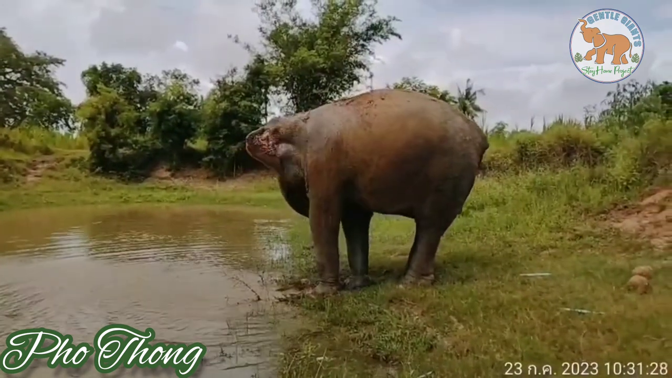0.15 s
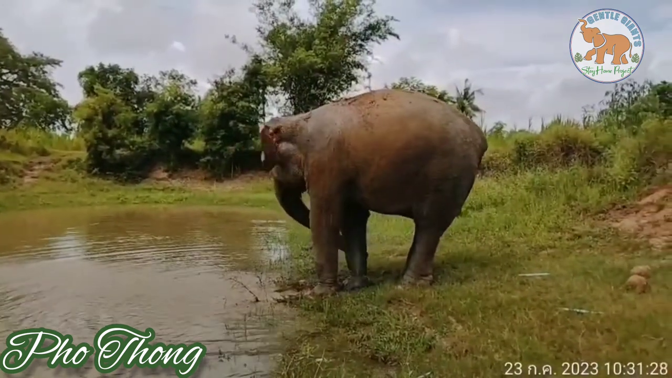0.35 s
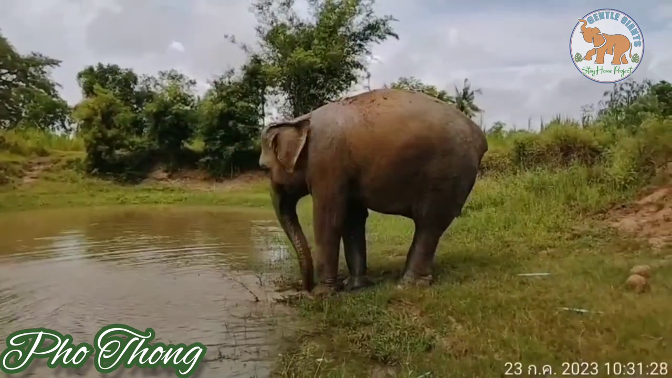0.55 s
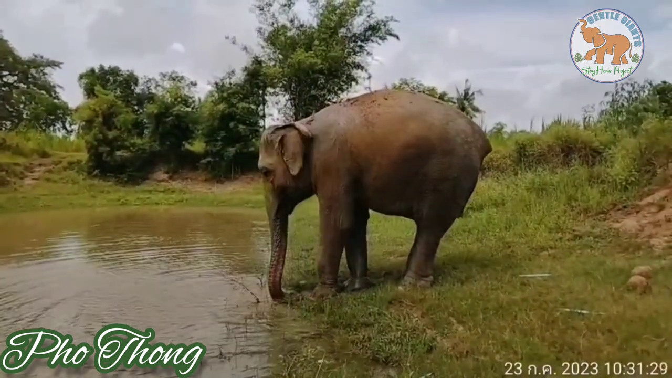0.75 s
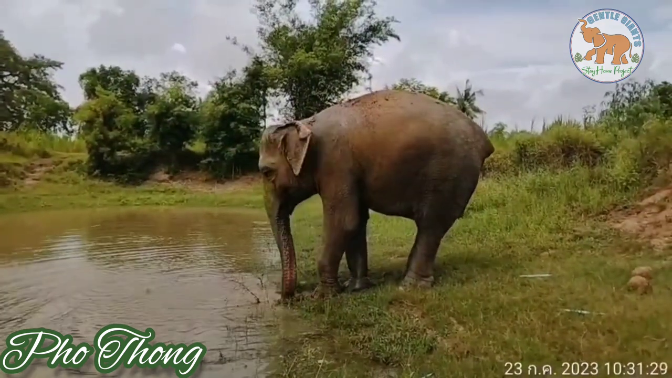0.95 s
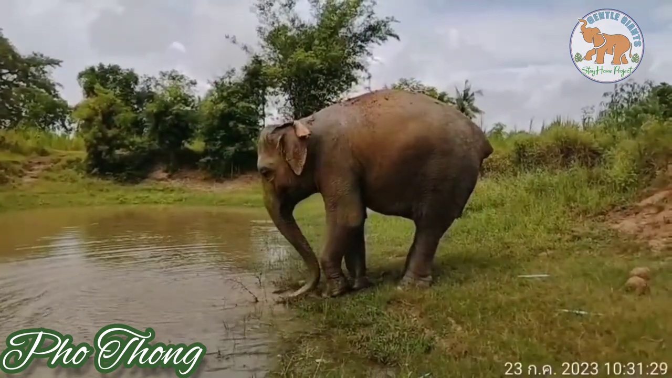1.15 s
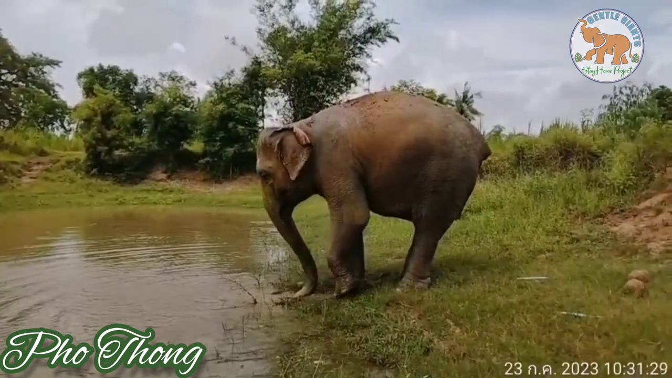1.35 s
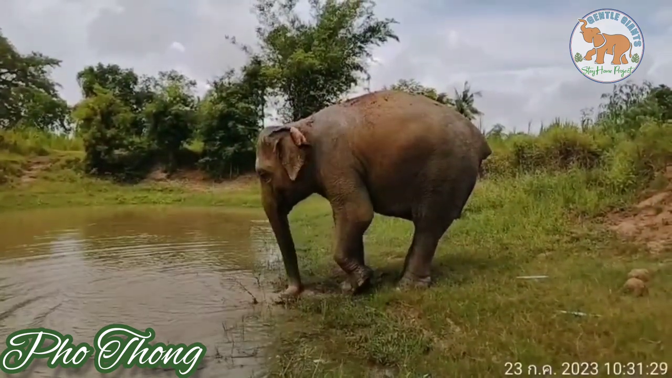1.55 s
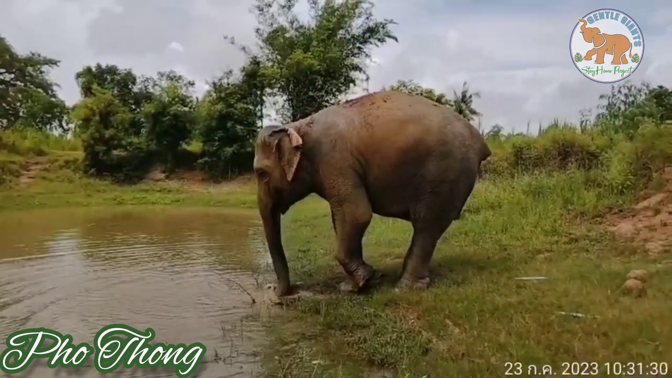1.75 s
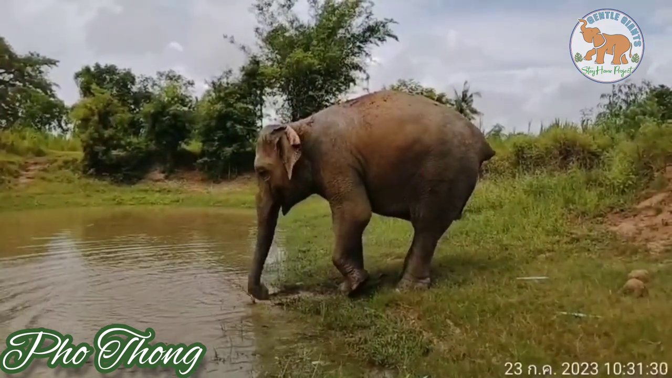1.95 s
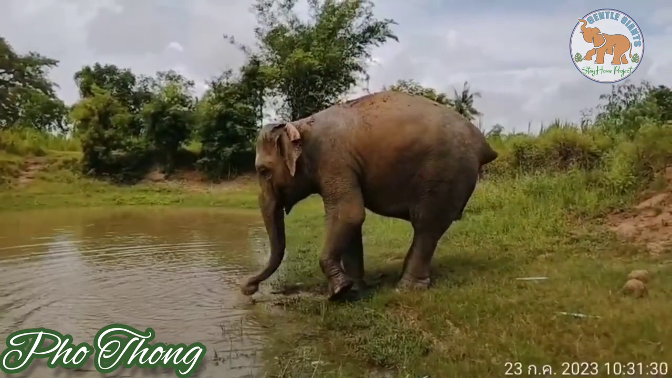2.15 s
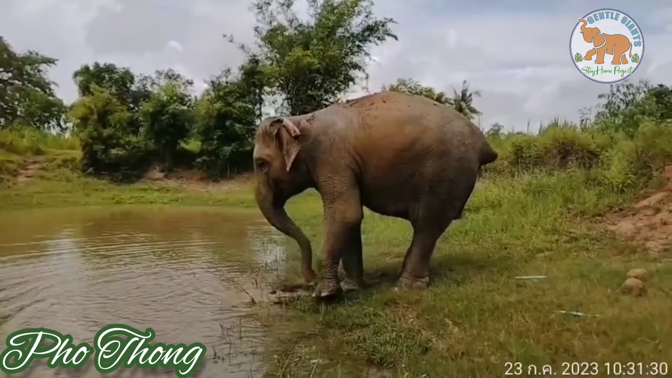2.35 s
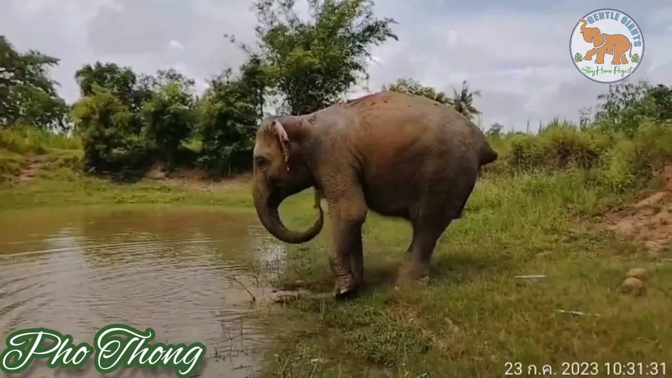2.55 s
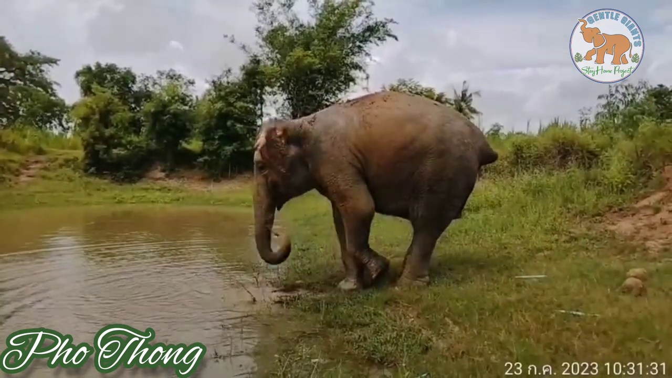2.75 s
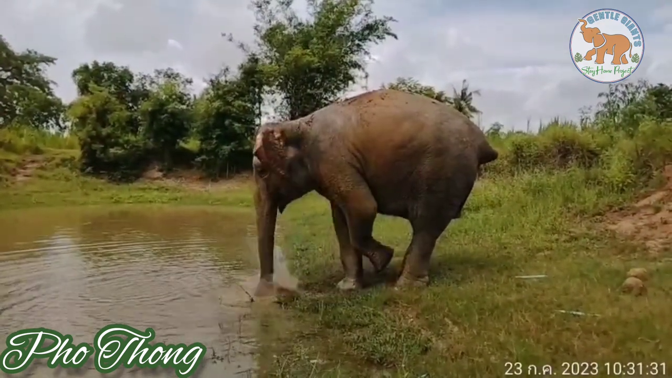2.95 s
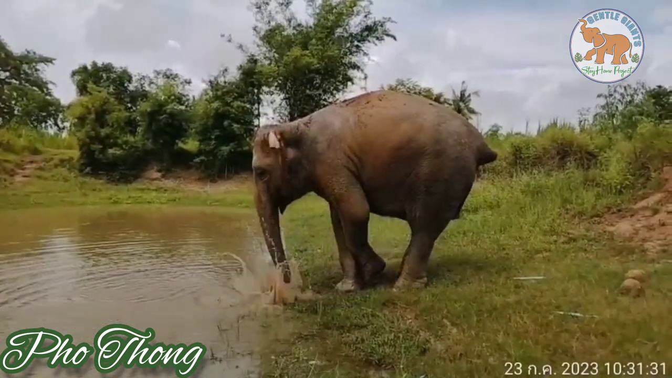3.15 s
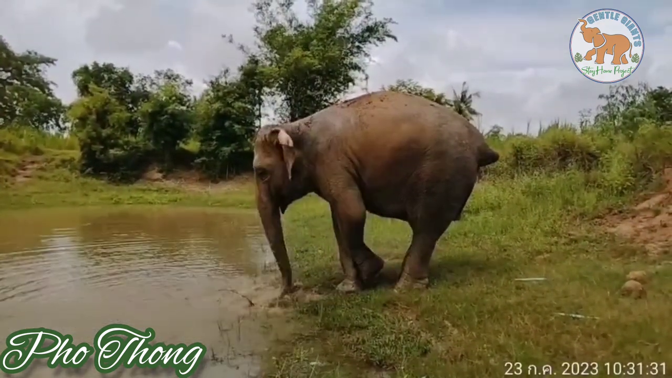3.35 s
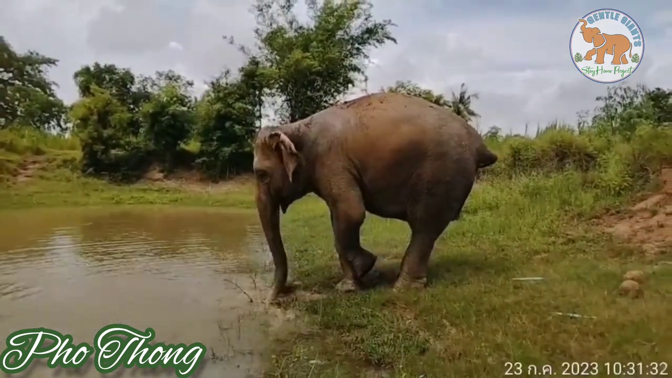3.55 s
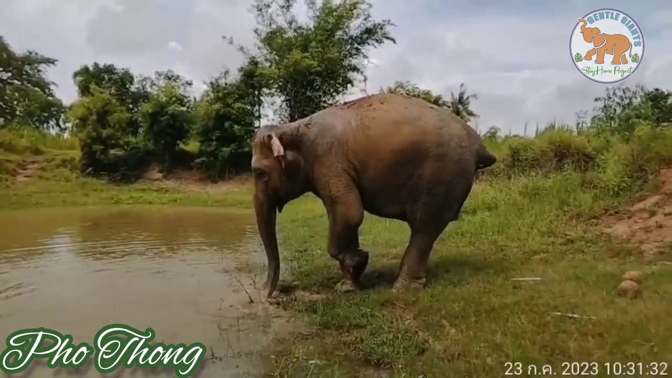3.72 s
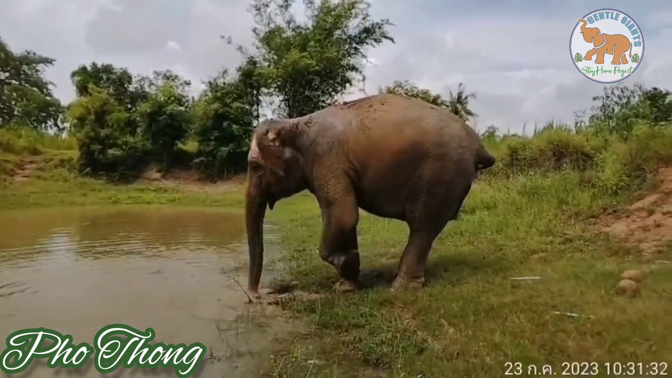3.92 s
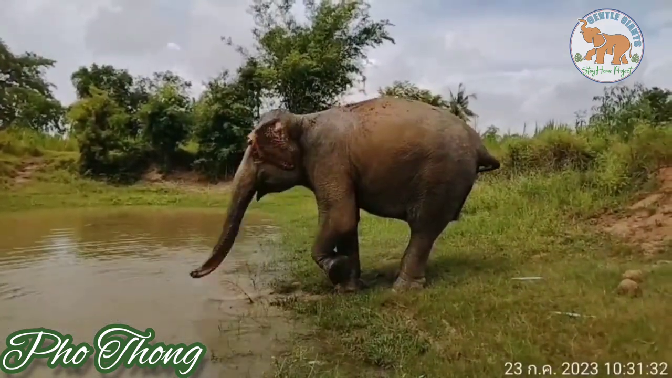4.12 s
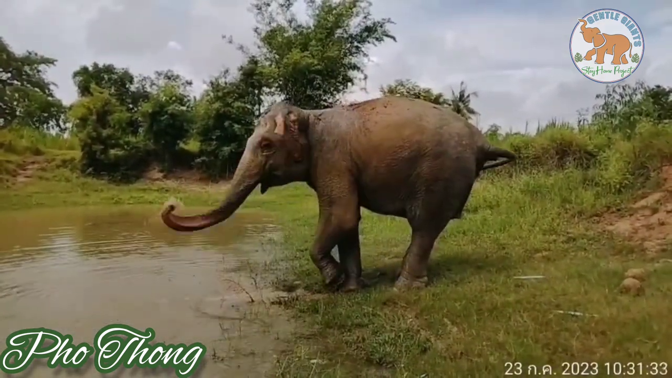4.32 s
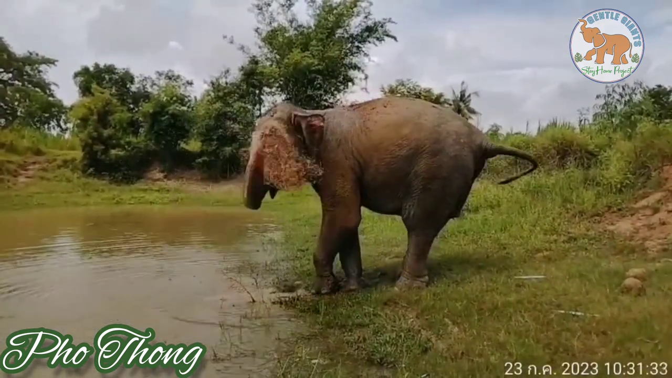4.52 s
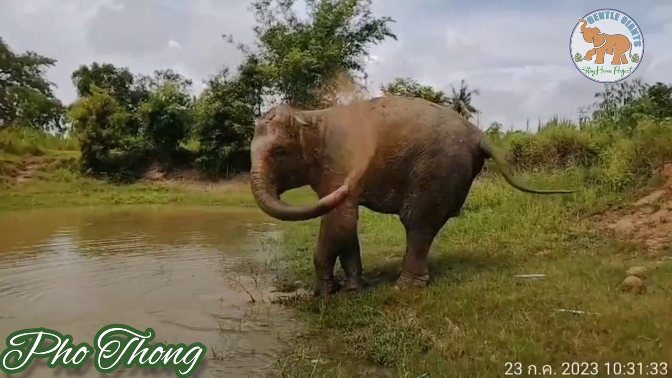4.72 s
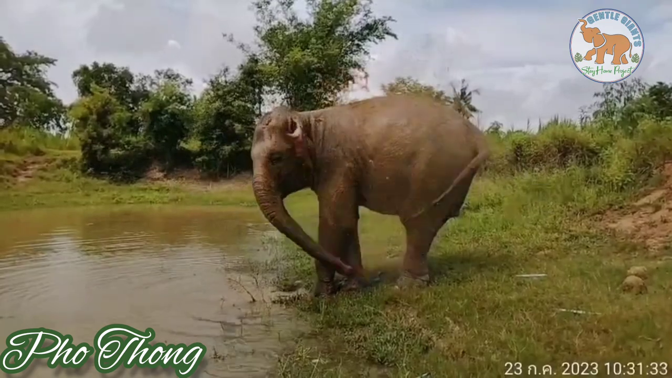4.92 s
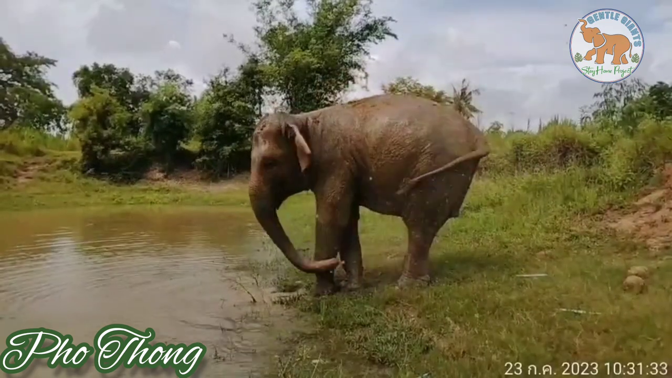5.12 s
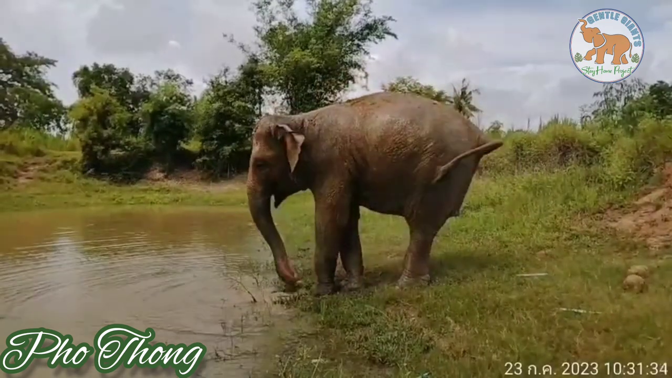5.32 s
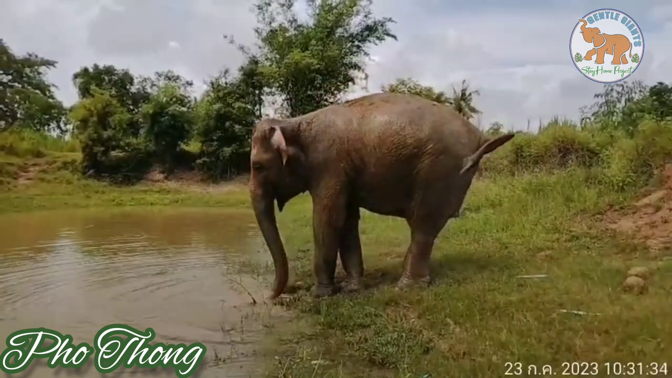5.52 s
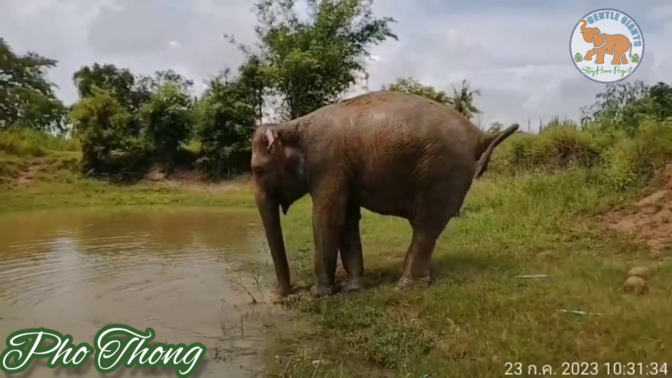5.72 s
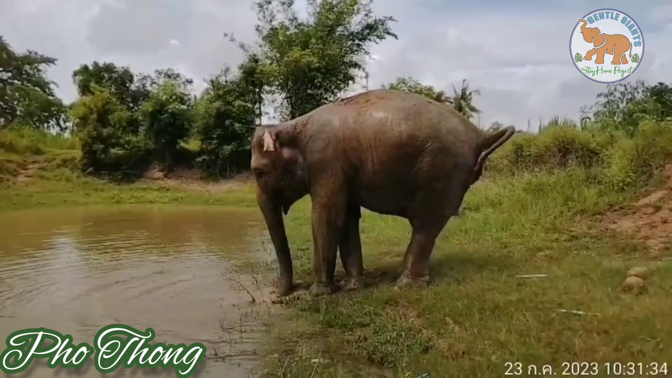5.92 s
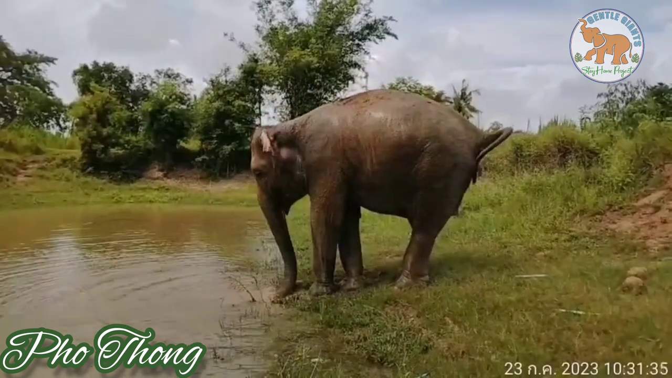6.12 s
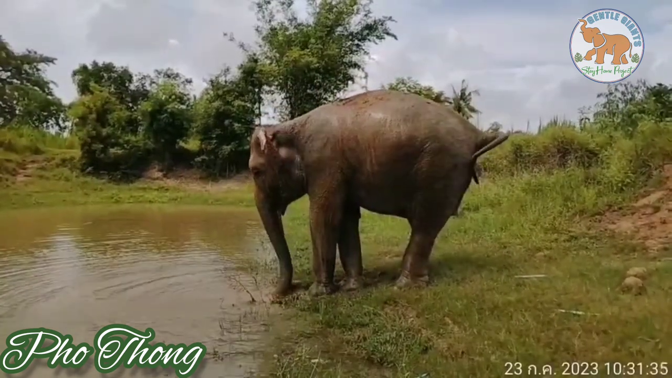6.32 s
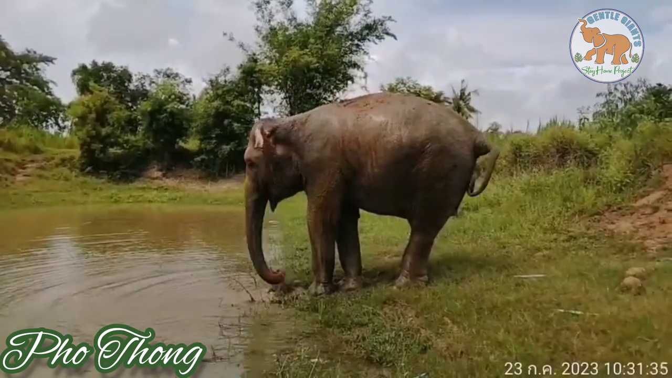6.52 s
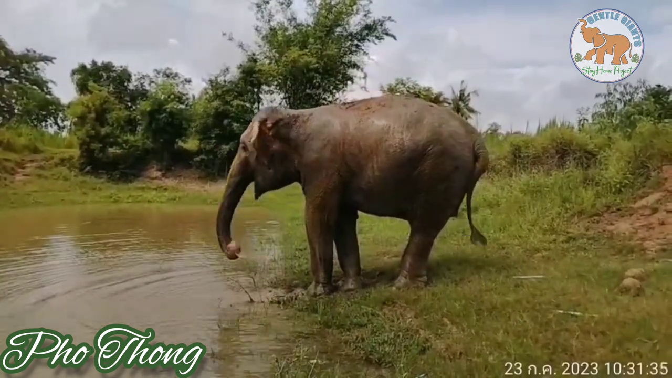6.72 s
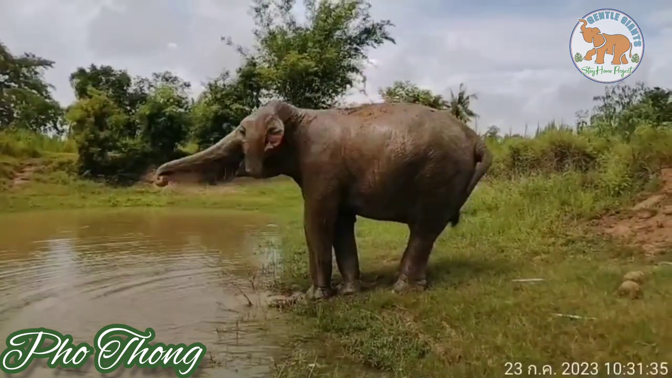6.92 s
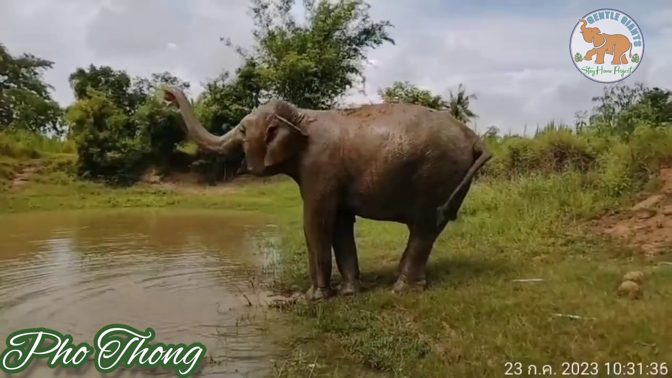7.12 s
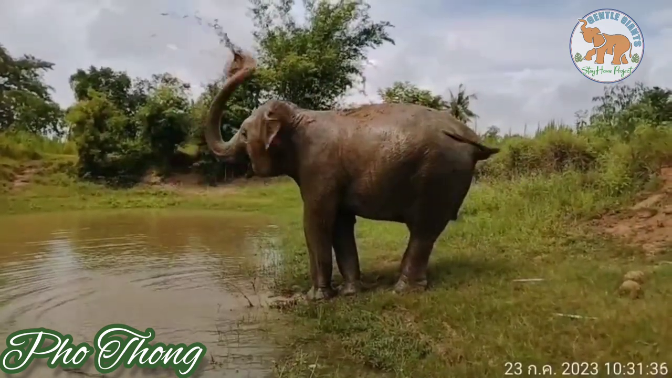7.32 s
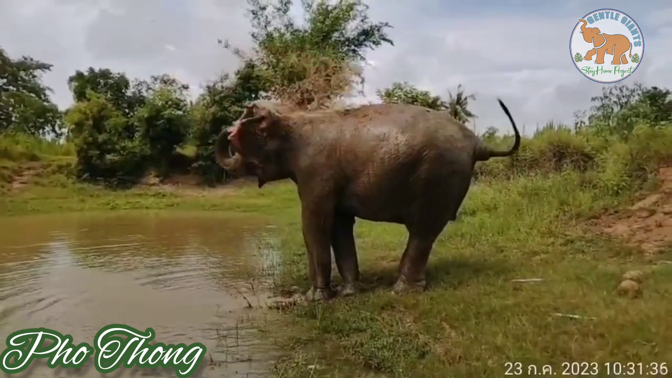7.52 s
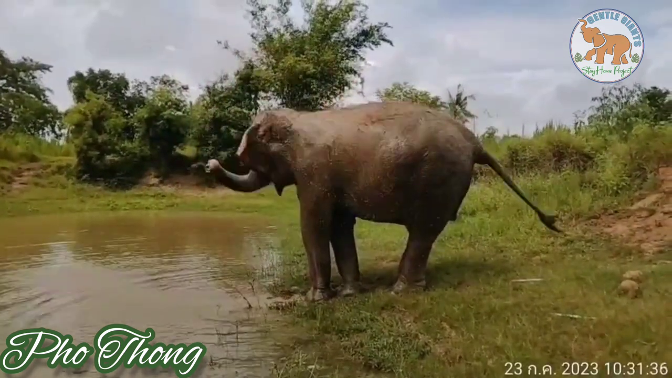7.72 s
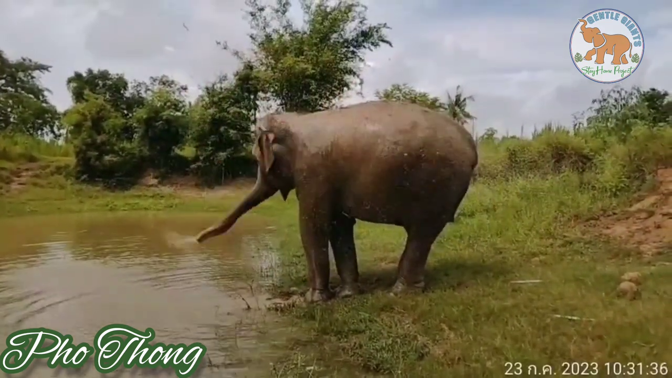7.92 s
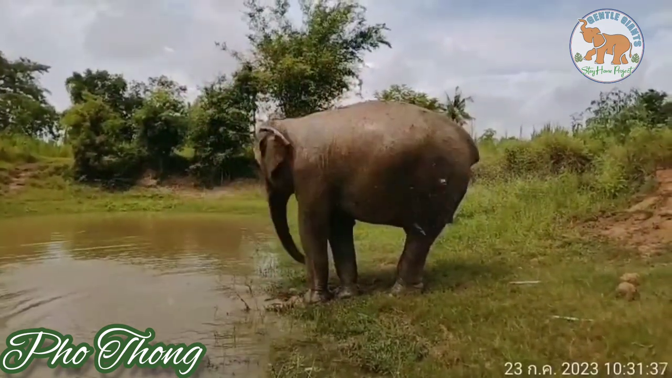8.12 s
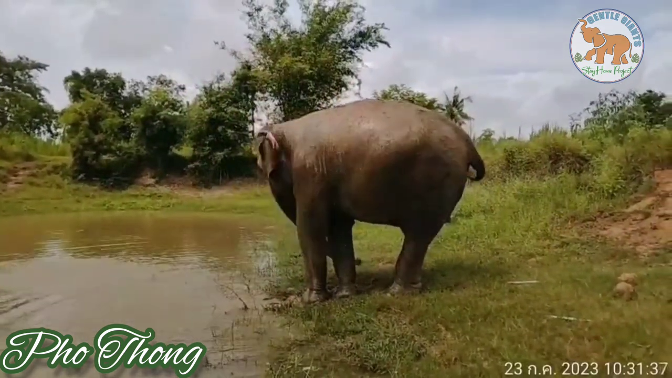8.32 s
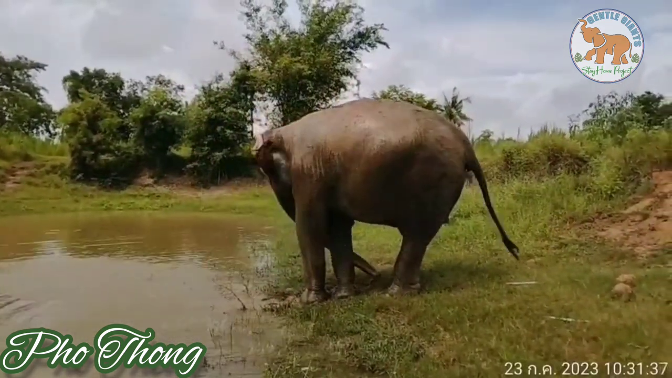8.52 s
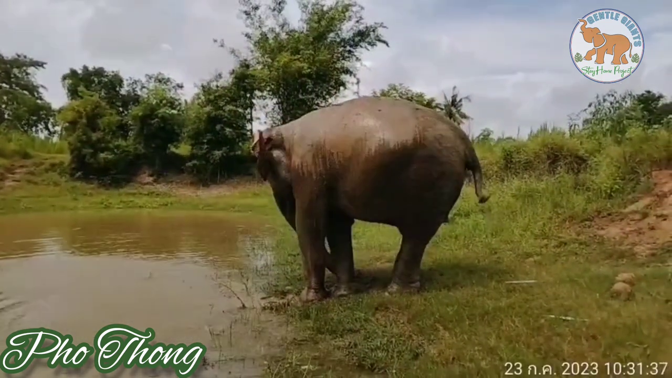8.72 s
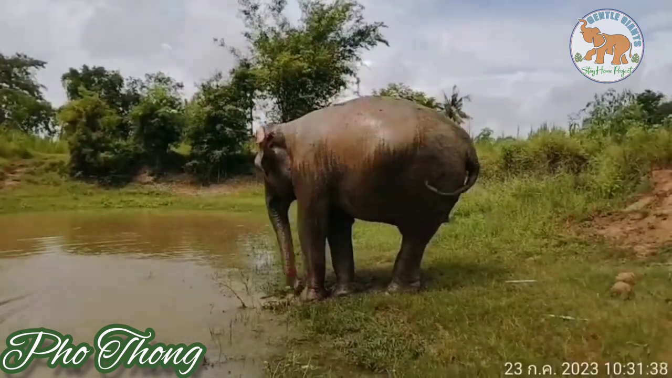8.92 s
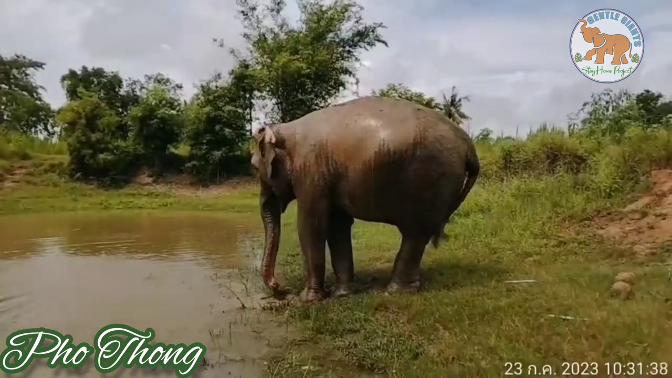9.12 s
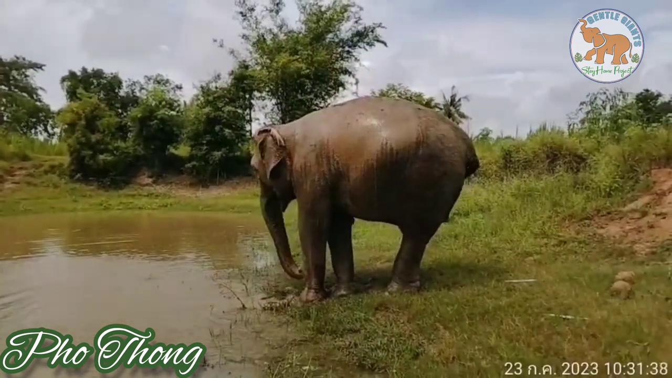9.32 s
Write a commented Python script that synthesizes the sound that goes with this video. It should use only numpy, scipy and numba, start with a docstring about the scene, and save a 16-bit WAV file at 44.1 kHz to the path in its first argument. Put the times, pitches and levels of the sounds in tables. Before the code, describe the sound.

An elephant's trunk stirs and gurgles in muddy shallows, flinging water that bursts into hissing spray, with drips, plops and splats in irregular clusters outdoors.

```python
"""Elephant splashing in a muddy pond

An elephant stirs the shallows with its trunk and flings water over its body. Ringing bubbles slosh and
gurgle as the water moves; dense impacts make the spray and the splats on hide and pond, and a trickle runs on.
Chirping sines are drips, short decaying sines are low plops and sharp pops close to the microphone.
Shaped noise gives a faint wavering whistle, outdoor hiss and a light breeze."""
import sys
import numpy as np
from scipy import signal
from scipy.fft import rfft, irfft
from scipy.io import wavfile
from scipy.ndimage import uniform_filter1d, map_coordinates
from numba import njit

SR = 44100
rng = np.random.default_rng(int(sys.argv[2]) if len(sys.argv) > 2 else 0)


def waveform_to_disk(signal):
    """Save audio, clipped to [-1, 1], as 16-bit WAV at the path in sys.argv[1]."""
    frames = np.transpose(np.atleast_2d(signal))
    scaled = np.clip(frames, -1, 1) * 32767
    samples = np.round(scaled).astype(np.int16)
    wavfile.write(sys.argv[1], SR, samples)


N = 417186
TIME = np.arange(N) / SR

# All levels are relative, ahead of any gain applied in the functions.
# spectral density of the hiss and of the breeze: frequency_hz, density_db
AIR_SPECTRUM = [(25, 6), (120, 3.5), (300, -2.5), (600, -8.5), (2000, -3.5), (3700, -9.5), (5500, -1),
                (8200, -3), (14500, -7.5)]
BREEZE_SPECTRUM = [(12, -14), (25, -0.5), (55, -1), (100, -6), (160, -19.5), (320, -24.5)]
# breeze on the microphone: time_s, level_db
BREEZE_LEVELS = [(0.0, -70.5), (2.74, -66), (4.19, -70.5), (5.13, -55), (5.21, -67.5), (5.85, -63),
                 (6.08, -78), (6.85, -73.5), (7.13, -68), (7.35, -73), (7.95, -66), (8.3, -70.5),
                 (9.46, -74)]
# narrow whistling band: time_s, pitch_hz, level_db
WHISTLE_PATH = [(5.08, 1330, -78), (5.15, 1340, -58), (5.231, 1250, -69), (5.3, 1224, -100),
                (5.501, 1330, -100), (5.55, 1364, -61), (5.62, 1250, -61), (5.75, 1380, -63),
                (5.83, 1260, -92)]
# close pops with a sharp tick on top: start_s, level_db, pitch_hz, tick_level_db
POP_EVENTS = [(2.2155, -23, 870, -17), (2.7439, -23, 740, -43), (5.6892, -34, 654, -60),
              (6.5043, -28.5, 775, -21.5), (7.4827, -37.5, 930, -50), (7.6650, -35.5, 920, -55),
              (9.0921, -32, 800, -60)]
# air pockets closing under a slap or a step: start_s, level_db, pitch_hz, t60_s
AIR_POCKETS = [(0.481, -38.5, 121, 0.076), (0.652, -43, 950, 0.017), (1.315, -44, 600, 0.073),
               (1.502, -48, 840, 0.015), (2.992, -35.5, 190, 0.0097), (3.015, -40.5, 604, 0.024),
               (3.593, -40, 1100, 0.029), (5.094, -31, 960, 0.014), (5.096, -34, 114.5, 0.103),
               (5.576, -38, 1200, 0.019), (5.574, -42.5, 188, 0.021), (5.690, -39, 298, 0.034)]
# single ringing drips: start_s, initial_pitch_hz, level_db
DRIP_EVENTS = [(1.071, 1780, -47), (1.158, 3270, -45), (1.641, 3070, -41), (1.908, 1170, -51),
               (2.502, 1580, -48), (2.648, 2800, -31.5), (3.487, 630, -47), (3.703, 2380, -49),
               (3.865, 3500, -36.5), (4.036, 2820, -38), (4.339, 980, -49), (5.574, 1580, -36.5),
               (5.928, 3880.0, -47.5), (6.753, 1110, -53), (6.952, 2500, -56), (7.366, 710, -61),
               (7.318, 4080, -50), (8.153, 2760, -36.5), (8.297, 2780, -45), (8.381, 4300, -35),
               (8.432, 2540, -42), (8.515, 5100, -25), (8.521, 3310, -23), (8.588, 3190, -34.5),
               (8.797, 3820, -45.5)]
# clumps of water and mud landing: peak_s, fall_s, bubbles_level_db, drops_level_db, spray_level_db
SPLAT_EVENTS = [(0.485, 0.015, -54.5, -49, -47), (.627, .012, -59.5, -52, -50),
                (0.666, 0.0084, -50, -47, -39.5), (.684, .012, -61, -56, -49), (0.744, 0.02, -69, -56, -57),
                (.7626, 0.007, -55.5, -57, -47), (.865, 0.01, -83, -56, -58),
                (1.2463, 0.018, -54.5, -73, -63), (1.647, 0.016, -54.5, -60.5, -59.5),
                (1.942, 0.016, -55, -57, -56), (2.1366, .0028, -75, -49, -45.5),
                (2.1807, 0.0097, -80, -68, -46), (2.274, 0.011, -69, -55.5, -56),
                (2.54, 0.014, -42.5, -38.5, -37), (2.624, 0.0093, -60, -58, -38),
                (2.648, 0.0077, -41, -50, -46), (2.772, 0.015, -55, -51.5, -47.5),
                (2.9917, .0056, -42, -35.5, -25.5), (3.291, 0.0028, -62, -46, -62),
                (3.556, 0.02, -68, -47, -51.5), (3.777, .004, -80, -55, -47.5),
                (3.867, 0.0025, -68, -48, -42.5), (3.878, 0.0079, -66, -65, -50),
                (3.987, .008, -52.5, -57, -63), (4.742, 0.019, -53, -65, -48),
                (5.094, 0.016, -49, -43, -45), (5.373, 0.0055, -80, -56, -54),
                (5.4125, .004, -61, -66, -43.5), (5.4193, .004, -64, -70, -44),
                (5.484, 0.012, -74, -54, -49), (5.567, 0.02, -50.5, -51, -41.5),
                (5.698, 0.0071, -48, -51, -62), (5.765, 0.0092, -58, -58, -49.5),
                (6.107, 0.009, -81, -64, -63), (6.177, .005, -64, -57, -57.5),
                (6.449, 0.014, -61, -60.5, -63), (7.0105, 0.0025, -78, -65, -53.5),
                (7.063, 0.017, -91, -71, -62), (7.206, 0.0088, -84, -61.5, -61),
                (7.568, 0.01, -52.5, -45, -40), (8.1007, 0.013, -69, -68, -48),
                (8.158, 0.02, -59, -51, -42.5), (8.284, 0.0059, -60, -50, -40),
                (8.3212, 0.0037, -54.5, -51, -41.5), (8.4232, 0.0039, -59, -44.5, -39.5),
                (8.434, 0.007, -82, -40, -39.5), (8.4911, 0.0016, -55.5, -47, -29.5),
                (8.514, 0.0012, -47, -28, -27), (8.5207, 0.0053, -47.5, -29.5, -34),
                (8.526, 0.0037, -57, -37, -39), (8.536, 0.0036, -75, -45, -46),
                (8.86, 0.0048, -73, -72, -52.5)]
# steady stretches of moving water (stirs, squirts, run-off and falling drops):
# start_s, length_s, bubbles_level_db, drops_level_db, spray_level_db
WATER_STRETCHES = [(0.0, .475, -61, -59, -56), (0.326, .14, -58, -73, -54.5),
                   (0.963, 0.22, -57.5, -61, -60.5), (1.279, 0.15, -55.5, -60, -59.5),
                   (1.697, 0.31, -63.5, -68.5, -68), (2.465, 0.033, -61.5, -61, -58),
                   (2.54, 0.232, -58, -51.5, -44), (2.623, 0.076, -57.5, -47.5, -38.5),
                   (2.782, 0.4, -96, -87, -62), (2.979, 0.68, -59.5, -57, -54),
                   (3.149, 0.097, -63, -59, -52.5), (3.636, 0.212, -69, -62, -59),
                   (3.982, 0.1, -52.5, -57, -61.5), (4.37, 0.025, -58.5, -58, -71),
                   (4.431, 0.15, -53.5, -64, -63), (4.603, 0.533, -51.5, -60, -56.5),
                   (4.691, 0.44, -70, -52, -43.5), (5.16, 0.596, -69.5, -66.5, -53.5),
                   (5.542, .17, -63.5, -59, -56.5), (6.517, 0.33, -71, -73.5, -70),
                   (8.116, 0.29, -66.5, -59.5, -47), (8.445, 0.11, -68, -57.5, -47)]
# flung water coming down: peak_s, rise_s, fall_s, bubbles_level_db, drops_level_db, spray_level_db
FALLING_SHOWERS = [(4.11, 0.022, 0.067, -59, -58, -62), (4.68, .2, 0.061, -53, -50.5, -49),
                   (4.716, 0.011, 0.094, -52.5, -40.5, -30.5), (5.08, 0.024, 0.025, -68, -54, -41),
                   (5.782, 0.036, 0.1, -69, -63.5, -54), (6.64, 0.083, 0.036, -74, -63, -53.5),
                   (7.47, 0.033, 0.041, -60.5, -57, -60), (7.673, 0.051, 0.2, -58.5, -49.5, -39.5),
                   (8.56, 0.15, 0.15, -62, -58, -53), (9.15, 0.066, .14, -78, -67, -54)]
# water trickling off trunk and hide: time_s, drops_level_db
TRICKLE_LEVELS = [(0, -58), (.58, -68), (1.8, -68.5), (2.9, -71.5), (4.2, -67.5), (5.5, -72.5),
                  (5.95, -78.5), (6.3, -86.5), (6.8, -77), (7.4, -72.5), (9.0, -82.5), (9.46, -81)]
# churning by trunk or foot, the deeper the lower: start_s, length_s, level_db, nominal_pitch_hz
GURGLE_EVENTS = [(0.0, 0.53, -59, 205.2), (0.626, 0.043, -61, 479), (0.969, 0.26, -66, 291),
                 (1.215, 0.18, -57, 258), (1.287, 0.069, -53.5, 581), (1.618, 0.34, -68, 310.6),
                 (2.281, 0.076, -58.5, 132), (2.348, .15, -67.5, 218.4), (2.518, 0.29, -59.5, 231),
                 (2.99, 0.038, -53, 160), (3.111, 0.12, -53, 190.6), (3.091, 0.14, -55, 522),
                 (4.004, 0.073, -58, 200), (4.325, 0.015, -62, 220), (4.427, 0.096, -61.5, 228),
                 (4.606, 0.56, -60, 249.6), (5.202, .58, -71, 219.7), (7.548, 0.53, -76.5, 230),
                 (8.137, .42, -72.5, 221)]
# spectral density of each grain size, deep gulps to fine spray: frequency_hz, density_db
GULP_SPECTRUM = [(70, -14), (120, 0), (185, 1.5), (270, -2), (420, -29), (700, -7.5)]
SLOSH_SPECTRUM = [(220, -27.5), (380, -6), (600, 5), (850, -1), (1200, 4), (1650, 1), (2100, -4),
                  (2700, -5.5), (4500, -48)]
DROP_SPECTRUM = [(1200, -12.5), (2000, -10.5), (2600, -7), (3300, 1.5), (4100, 3), (4800, -5),
                 (5700, -11.5), (7000, -8), (10000, -28)]
SPRAY_SPECTRUM = [(3000, -28.5), (5500, -11.5), (6700, -4.5), (7500, 3), (8300, 5), (9400, -1), (11800, 1),
                  (13300, -0.5), (14500, -30)]

AIR_DB = -74.5
CUTOFF_HZ = 14500
STRETCH_ATTACK_S, STRETCH_RELEASE_S = 0.0053, 0.019
# trickle levels against its drops
TRICKLE_BUBBLES_DB, TRICKLE_SPRAY_DB, TRICKLE_GULPS_DB = -3, 2.5, -9.5
SPLAT_EVEN_S = 0.023  # fall time at which a clump would rise as slowly as it falls
GULP_REFERENCE_HZ = 200.5  # nominal gulp pitch in water of middling depth


def from_db(db):
    """Level law: 20 dB is a factor of ten in amplitude."""
    return 10 ** (np.asarray(db) / 20)


def rms_one(x):
    """Normalization to unit root-mean-square amplitude."""
    return x / np.sqrt(np.mean(x ** 2) + 1e-20)


def gains(rows):
    """Linear interpolation in decibels: one gain curve for each level column."""
    times_s, *columns_db = np.transpose(rows)
    return [from_db(np.interp(TIME, times_s, db)) for db in columns_db]


def filtered(x, order, cutoff_hz, kind="low"):
    """Butterworth filtering: a maximally flat passband."""
    return signal.sosfilt(signal.butter(order, cutoff_hz, kind, fs=SR, output="sos"), x)


def coloured(x, points, size=16384):
    """Minimum-phase filtering: a folded cepstrum makes a magnitude response causal; rms 1."""
    hz, db = np.transpose(points)
    grid_hz = np.maximum(np.arange(size // 2 + 1) * SR / size, 1)
    octaves_outside = np.abs(np.log2(grid_hz / np.clip(grid_hz, hz[0], hz[-1])))
    # beyond the end points: 20 dB per octave, for two octaves at most
    shape_db = np.interp(np.log(grid_hz), np.log(hz), db) - 20 * np.minimum(octaves_outside, 2)
    cepstrum = irfft(np.log(from_db(shape_db)))
    cepstrum[1:size // 2] *= 2
    cepstrum[size // 2 + 1:] = 0
    response = irfft(np.exp(rfft(cepstrum)))[:size // 2]
    return rms_one(signal.oaconvolve(x, response)[:N])


def evened(x, window_s):
    """Division by running rms removes slow swings of level and keeps the grain."""
    size = max(int(window_s * SR / 2), 2)
    power = uniform_filter1d(uniform_filter1d(x * x, size), size)
    return x / np.sqrt(np.abs(power) + 1e-6)


def patchy(x, depth_db, patch_hz, patch_s):
    """Random gain for each band and moment: narrow bands swell and fade on their own."""
    hz, times_s, spectra = signal.stft(x, SR, nperseg=512)
    rows, columns = np.meshgrid(hz / patch_hz, times_s / patch_s, indexing="ij")
    chance = rng.standard_normal((256, 2048))
    gain_db = depth_db * map_coordinates(chance, [rows, columns], order=1, mode="mirror")
    _, uneven = signal.istft(spectra * from_db(gain_db), SR, nperseg=512)
    return rms_one(uneven[:N])


def impacts(per_s, spread_db):
    """Random arrivals of either sign: many small impacts, a few large."""
    born = rng.random(N) < per_s / SR
    heights = from_db(spread_db * np.minimum(rng.exponential(1, N), 4.5))
    return born * heights * rng.choice([-1, 1], N)


@njit
def ring_bubbles(starts, hz, heights, cycles, glide, length, rate):
    """Damped bubble resonance: sines swell quickly and die, rising in pitch towards the surface."""
    out = np.zeros(length)
    for k in range(len(starts)):
        life = int(cycles[k] * rate / hz[k]) + 1
        height, phase = heights[k], 0.
        loss = np.exp(-np.log(1000) / life)  # 60 dB over the life
        for i in range(min(life, length - starts[k])):
            onset = min(1., 10 * i / life)
            out[starts[k] + i] += height * onset * np.sin(phase)
            phase += 2 * np.pi * hz[k] / rate * (1 + glide * i / life)
            height *= loss
    return out


def bubbles(per_s, low_hz, high_hz, cycles, spread_db, glide):
    """Bubble entrainment: each impact traps a bubble with a size and ring time of its own."""
    heights = impacts(per_s, spread_db)
    starts = np.flatnonzero(heights)
    size, damping = rng.random((2, N))[:, starts]
    hz = low_hz * (high_hz / low_hz) ** size
    # short-lived small bubbles are struck harder, so that all pitches are equally strong
    struck = heights[starts] * hz / high_hz
    return rms_one(ring_bubbles(starts, hz, struck, cycles * (.5 + damping), glide, N, SR))


def dying_sine(start_s, hz, t60_s):
    """Free damped oscillation: a unit sine under an exponential decay."""
    out = np.zeros(N)
    near = slice(int(start_s * SR), int((start_s + 2 * t60_s) * SR))
    age_s = np.maximum(TIME[near] - start_s, 0)
    out[near] = np.sin(2 * np.pi * hz * age_s) * np.exp(-np.log(1000) * age_s / t60_s)
    return out


def air():
    """Stationary noise: the steady far hiss of open country."""
    return from_db(AIR_DB) * coloured(rng.standard_normal(N), AIR_SPECTRUM)


def breeze():
    """Low-frequency wind noise: light wind rumbles on the microphone."""
    rumble = coloured(rng.standard_normal(N), BREEZE_SPECTRUM)
    return gains(BREEZE_LEVELS)[0] * evened(rumble, window_s=0.43)


def whistle(flutter_hz=55):
    """Quadrature modulation: slow noise broadens a gliding carrier into an airy band."""
    times_s, hz, db = np.transpose(WHISTLE_PATH)
    phase = 2 * np.pi * np.cumsum(np.interp(TIME, times_s, hz)) / SR
    waver = rms_one(filtered(rng.standard_normal((2, N)), 2, flutter_hz))
    gain = np.interp(TIME, times_s, from_db(db), left=0, right=0)
    return gain * .5 * ((1 + waver[0]) * np.cos(phase) + waver[1] * np.sin(phase))


def pops(t60_s=0.0019, body_gain_db=5, tick_hz=9500, tick_t60_s=0.0002, tick_gain_db=6, low_cut_hz=200):
    """Heavily damped pressure pulse: a push and pull with a tick at its front."""
    pulses = np.zeros(N)
    for start_s, db, hz, tick_db in POP_EVENTS:
        pulses += from_db(db + body_gain_db) * dying_sine(start_s, hz, t60_s)
        tick_start_s = round(start_s * SR) / SR  # on a whole sample
        pulses += from_db(tick_db + tick_gain_db) * dying_sine(tick_start_s, tick_hz, tick_t60_s)
    return filtered(pulses, 2, low_cut_hz, "high")


def plops():
    """Cavity resonance: a large air pocket rings briefly as it closes."""
    return sum(from_db(db) * dying_sine(start_s, hz, t60_s) for start_s, db, hz, t60_s in AIR_POCKETS)


def drips(cycles=34, glide=0.044, gain_db=4):
    """Single-bubble resonance: a falling drop traps one bubble, which chirps upward."""
    start_s, hz, db = np.transpose(DRIP_EVENTS)
    starts = (start_s * SR).astype(np.int64)
    life_cycles = np.full(len(starts), cycles, float)
    return ring_bubbles(starts, hz.copy(), from_db(db + gain_db), life_cycles, glide, N, SR)


def splat_gains():
    """Impulsive envelopes added in power: bubbles, drops and spray swell and die in milliseconds."""
    power = np.zeros((3, N))
    for peak_s, fall_s, *levels_db in SPLAT_EVENTS:
        rise_s = fall_s * (fall_s / SPLAT_EVEN_S) ** 2  # smaller clumps hit far more sharply
        near = slice(max(int((peak_s - .1) * SR), 0), int((peak_s + .1) * SR))
        age_s = TIME[near] - peak_s
        shape = np.exp(-np.maximum(-age_s / rise_s, age_s / fall_s))
        power[:, near] += np.outer(from_db(levels_db), shape) ** 2
    return np.sqrt(power)


def splats():
    """Shot noise: each clump is a burst of impacts too dense to tell apart."""
    slosh_gain, drop_gain, spray_gain = splat_gains()
    burst = impacts(per_s=14000, spread_db=7.5)
    slosh = from_db(1.5) * evened(coloured(burst, SLOSH_SPECTRUM), window_s=0.0023)
    drops = from_db(4.5) * evened(coloured(burst, DROP_SPECTRUM), window_s=0.0074)
    fine = from_db(4.0) * evened(coloured(burst, SPRAY_SPECTRUM), window_s=0.014)
    return slosh_gain * slosh + drop_gain * drops + spray_gain * fine


def swell(peak_s, rise_s, fall_s):
    """Two-sided exponential: a shower thickens up to its peak, then thins out."""
    age_s = TIME - peak_s
    return np.exp(-np.minimum(np.maximum(-age_s / rise_s, age_s / fall_s), 30))


def stretch(start_s, length_s):
    """Steady flow between transients: a quick linear rise, a hold, and an exponential release."""
    age_s = TIME - start_s
    settling = np.clip((age_s - length_s) / STRETCH_RELEASE_S, 0, 30)
    return np.clip(age_s / STRETCH_ATTACK_S, 0, 1) * np.exp(-settling)


def summed(shapes, levels_db):
    """Incoherent addition: powers add, giving one gain curve for each level column."""
    return np.sqrt(from_db(levels_db).T ** 2 @ np.square(shapes))


def water_gains():
    """Superposition of steady stretches, showers and trickle: gains of bubbles, drops and spray."""
    shapes = [stretch(*row[:2]) for row in WATER_STRETCHES]
    shapes += [swell(*row[:3]) for row in FALLING_SHOWERS]
    shapes += gains(TRICKLE_LEVELS)
    levels_db = [row[2:] for row in WATER_STRETCHES]
    levels_db += [row[3:] for row in FALLING_SHOWERS]
    levels_db += [(TRICKLE_BUBBLES_DB, 0, TRICKLE_SPRAY_DB)]
    return summed(shapes, levels_db)


def spray(gain):
    """Droplet shot noise: a dense crackle, with bursts as larger drops shatter."""
    shatter_decay = np.exp(-1 / (0.0064 * SR))  # 6.4 ms time constant
    shatters = signal.lfilter([1], [1, -shatter_decay], np.abs(impacts(per_s=120, spread_db=4.5)))
    crackle = impacts(per_s=14000, spread_db=0.0) * np.sqrt(1 + (from_db(-8.0) * shatters) ** 2)
    crackle = patchy(crackle, depth_db=4.5, patch_hz=306.0, patch_s=0.023)
    crackle = coloured(crackle, SPRAY_SPECTRUM)
    # a hard jet breaks up finer, so it sounds brighter
    mist = rms_one(filtered(impacts(per_s=7200, spread_db=3.5), 2, [9800, 13000], "band"))
    mixed = crackle + np.sqrt(gain / from_db(-31.5)) * mist
    return gain * from_db(0.5) * evened(mixed, window_s=0.48)


def busy(gain):
    """Event density as a share of full flow: a trickle sounds bubbles singly, a slosh in crowds."""
    return np.clip(gain / from_db(-52.5), .06, 1.5)


def churn(gulps):
    """Pitch by time scaling: each gurgle replays gulps at its own rate; more lie under the trickle."""
    out = gains(TRICKLE_LEVELS)[0] * from_db(TRICKLE_GULPS_DB) * gulps
    for start_s, length_s, db, hz in GURGLE_EVENTS:
        read_s = (start_s + (TIME - start_s) * hz / GULP_REFERENCE_HZ) % TIME[-1]
        pitched = np.interp(read_s, TIME, gulps)
        out = out + from_db(db) * stretch(start_s, length_s) * pitched
    return out


def moving_water(slosh_gain, drop_gain):
    """Bubble resonance at three sizes of grain: deep gulps, sloshing bubbles and ticking drops."""
    gulps = bubbles(per_s=300, low_hz=129.7, high_hz=633, cycles=9.3, spread_db=4.0, glide=0.15)
    slosh = bubbles(per_s=1900 * busy(slosh_gain), low_hz=294.6, high_hz=3110,
                    cycles=20.0, spread_db=1.5, glide=0.075)
    drops = bubbles(per_s=2600 * busy(drop_gain), low_hz=1608, high_hz=6880,
                    cycles=42.5, spread_db=3.0, glide=0.19)
    # impacts that trap no bubble only tick, and merge into a wash
    ticks = rms_one(impacts(per_s=9000, spread_db=2.5))
    slosh = evened(slosh, window_s=0.42) + from_db(9.5) * ticks
    slosh = patchy(slosh, depth_db=6.0, patch_hz=216, patch_s=.028)
    drops = evened(drops, window_s=.2) + from_db(6.5) * ticks
    drops = patchy(drops, depth_db=5.0, patch_hz=326.0, patch_s=.018)
    gulps = from_db(-2.0) * evened(coloured(gulps, GULP_SPECTRUM), window_s=0.11)
    slosh = from_db(-0.1) * evened(coloured(slosh, SLOSH_SPECTRUM), window_s=0.094)
    drops = from_db(1.6) * evened(coloured(drops, DROP_SPECTRUM), window_s=0.11)
    return churn(gulps) + slosh_gain * slosh + drop_gain * drops


def scene():
    """Mid-side superposition: all sources lie straight ahead; only fine treble spreads."""
    slosh_gain, drop_gain, spray_gain = water_gains()
    background = air() + breeze() + whistle()
    events = pops() + plops() + drips() + splats()
    centre = background + events + spray(spray_gain) + moving_water(slosh_gain, drop_gain)
    # fresh random draws, of opposite sign in the two channels
    scattered = spray(spray_gain) + .5 * (splats() + air())
    side = from_db(-4) * filtered(scattered, 8, 6000, "high")
    return centre + side * np.array([[1], [-1]])


def record(dry):
    """Band limitation: a steep low-pass cuts the top."""
    return filtered(dry, 48, CUTOFF_HZ)


dry = scene()
out = record(dry)
waveform_to_disk(out)
```